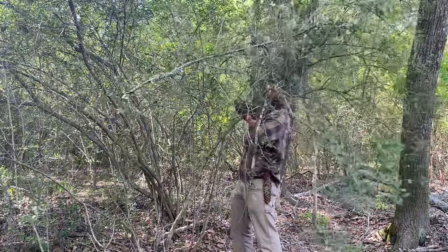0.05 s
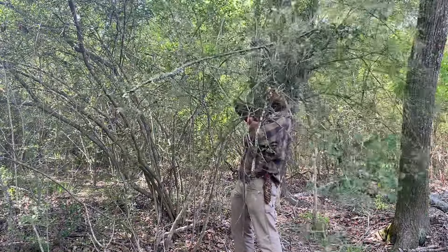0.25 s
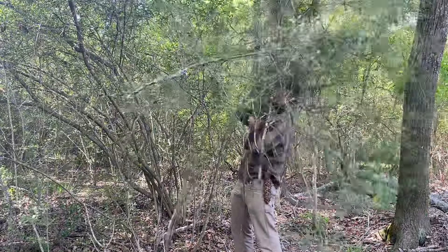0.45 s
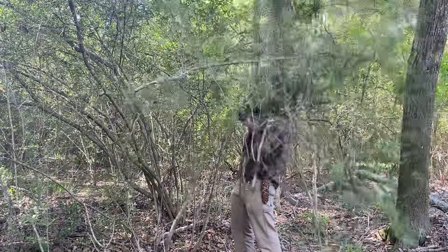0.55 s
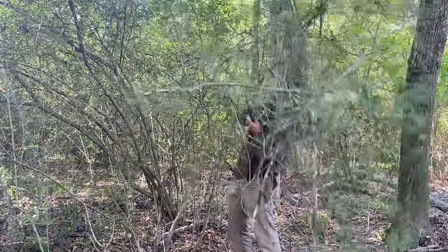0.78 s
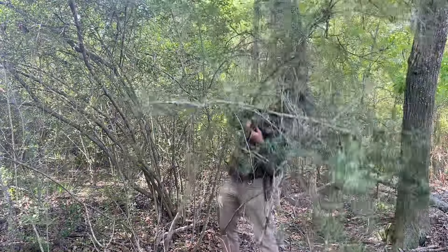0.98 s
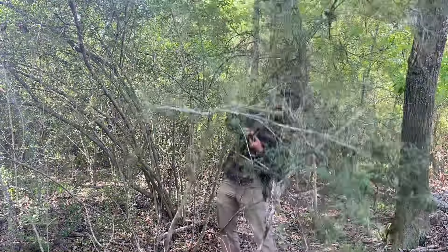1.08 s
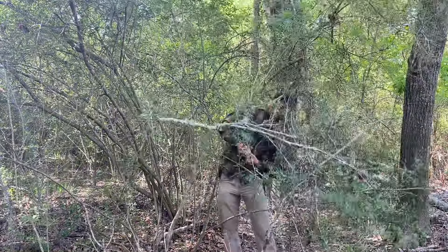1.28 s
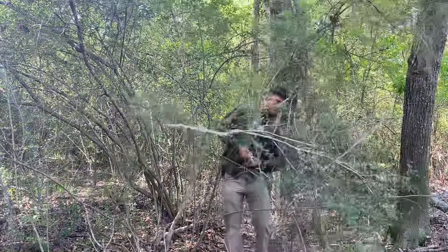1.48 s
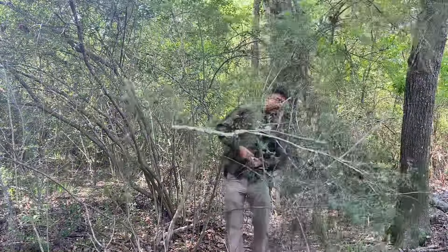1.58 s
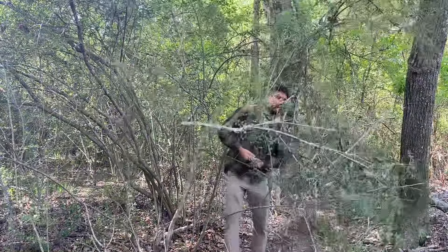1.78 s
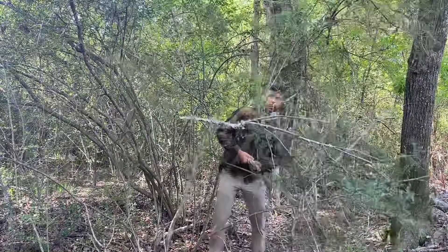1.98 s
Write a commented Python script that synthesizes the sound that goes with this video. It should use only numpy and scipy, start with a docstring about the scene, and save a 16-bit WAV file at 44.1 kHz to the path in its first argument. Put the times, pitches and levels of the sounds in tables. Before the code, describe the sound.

A branch cracks off a tree, then leaves rustle and small twigs snap.

```python
"""A branch is pulled off a tree in a wood. The bough swishes over a low rumble and jolts softly.
Two sharp cracks ring the modes of the wood, a run of fibres tears, and a dull knock sounds as the
branch comes free. Its leaves swish down and rustle, small twigs snap, and feet shuffle on the litter.
Ground and trunks reflect each crack, snap and knock to a closely spaced pair of microphones."""
import sys
import numpy as np
from scipy import signal
from scipy.fft import rfft, irfft
from scipy.io import wavfile
from scipy.ndimage import uniform_filter1d

SR = 44100
rng = np.random.default_rng(int(sys.argv[2]) if len(sys.argv) > 2 else 0)


def wav_record(signal):
    """Record a signal, one row per channel, as 16-bit PCM in the file named by sys.argv[1]."""
    frames = np.transpose(np.atleast_2d(signal))
    bounded = np.clip(frames, -1, 1)
    # unit amplitude maps onto the largest positive 16-bit level
    quanta = np.round(bounded * 32767).astype(np.int16)
    wavfile.write(sys.argv[1], SR, quanta)


N = 90404


def amp(db):
    """Amplitude ratio: tenfold for every 20 dB."""
    return 10 ** (np.asarray(db) / 20)


def unit(x):
    """Normalisation to rms 1."""
    return x / np.sqrt(np.mean(x ** 2) + 1e-20)


def spectrum(points, hz):
    """Interpolation on a log-frequency axis."""
    f, value = np.transpose(points)
    return np.interp(np.log(hz + 1), np.log(f + 1), value)


def envelope(points):
    """Amplitude envelope: gain over time from a dB curve."""
    return amp(np.interp(np.arange(N) / SR, *np.transpose(points)))


def add(mix, start_s, sound):
    """Superposition: a sound sums into the mix from its start time."""
    part = mix[max(round(start_s * SR), 0):][:len(sound)]
    part += sound[:len(part)]


# Likeness of diffuse sound in the two channels. Each row: frequency in Hz, correlation from -1 to 1.
COHERENCE = [(30, 0), (70, 0.7), (160, 0.88), (300, 0.68), (550, 0.06), (900, -.15), (1400, 0.35),
             (2100, 0.73), (3200, 0.56), (4200, 0.65), (5700, 0.04), (7000, 0.96), (8100, 1), (8700, 1),
             (9400, 1), (9900, 0), (10700, .98), (11700, .98), (12300, .6), (12700, 0.75), (13600, 0.95),
             (14100, .5), (14900, .99)]

def diffuse(pair, colour):
    """Partial coherence: two independent signals are coloured and mixed to be partly alike."""
    hz = np.fft.rfftfreq(pair.shape[1], 1 / SR)
    a, b = rfft(pair) * amp(spectrum(colour, hz))
    coherence = np.clip(spectrum(COHERENCE, hz), -1, 1)
    mid, side = a * np.sqrt(1 + coherence), b * np.sqrt(1 - coherence)
    return unit(irfft(np.array([mid + side, mid - side]), pair.shape[1]))


def patchy_noise(colour, flicker_db, size=256):
    """Random modulation: noise flickers in small patches of time and frequency."""
    cells = signal.stft(rng.standard_normal((2, N)), nperseg=size)[2]
    across_bands = uniform_filter1d(rng.standard_normal(cells.shape[1:]), size=14, axis=0)
    patches = unit(uniform_filter1d(across_bands, size=5, axis=1))
    noise = signal.istft(cells * amp(flicker_db * patches), nperseg=size)[1]
    return diffuse(noise[:, :N], colour)


def grains(per_s, spread_db, colour, bands=16):
    """Shot noise: tiny clicks of random time and size each excite a short ring."""
    t, out = np.arange(128) / SR, np.zeros((2, N))
    for hz in np.geomspace(1500, 15000, bands):
        sizes = amp(spread_db * np.minimum(rng.exponential(1, (2, N)), 4))
        occurs = rng.random((2, N)) < per_s / bands / SR / 2
        clicks = sizes * occurs * rng.choice([-1, 1], (2, N))
        ring = np.exp(-t * hz / 3.1) * np.cos(2 * np.pi * hz * t) * hz
        out += signal.oaconvolve(clicks, ring[None], axes=1)[:, :N]
    return diffuse(out, colour)


# Course of the swish. Each row: time in seconds, level in dB.
SWISH_LEVEL = [(0, -60), (.17, -57.5), (.3, -57), (.39, -56), (.44, -59), (.5, -56.5), (.6, -55),
               (.68, -55.5), (.8, -54), (1, -55), (1.13, -60.5), (1.26, -61), (1.35, -60), (1.47, -60.5),
               (1.53, -55), (1.6, -59.5), (1.72, -64), (1.9, -63), (2.05, -62.5)]
# Its spectrum. Each row: frequency in Hz, gain in dB.
SWISH_COLOUR = [(30, -62), (70, -23), (120, -6.5), (200, -3.5), (330, -4.5), (480, -5), (800, -5.5),
                (1300, -10), (2200, -16.5), (5000, -60), (16000, -30)]

def bough_swish():
    """Flow and friction noise: the bough sweeps through air and brush."""
    return envelope(SWISH_LEVEL) * patchy_noise(SWISH_COLOUR, flicker_db=1)


# Course of the rumble. Each row: time in seconds, level in dB.
RUMBLE_LEVEL = [(0, -73), (.06, -66), (.15, -96), (.33, -79), (.39, -67), (.46, -78), (.55, -78.5),
                (.68, -70.5), (.78, -56), (.85, -65), (.98, -54), (1.12, -64.5), (1.4, -78), (1.52, -64),
                (1.6, -83), (1.7, -83), (1.88, -74.5), (1.98, -70), (2.05, -67)]
# Its spectrum. Each row: frequency in Hz, gain in dB.
RUMBLE_COLOUR = [(20, -30), (40, -23), (70, -1), (110, -4.5), (170, -3.5), (300, -47.5), (1000, -64)]

def rumble():
    """Low-frequency noise: steps and moving air make slow pressure fluctuations."""
    return envelope(RUMBLE_LEVEL) * diffuse(rng.standard_normal((2, N)), RUMBLE_COLOUR)


# Courses of the bright and the lower, papery rustle. Each row: time in seconds, level in dB.
BRIGHT_LEVEL = [(0, -74), (.17, -72), (.3, -75), (.37, -47.5), (.43, -52.5), (.5, -55.5), (.57, -47.5),
                (.68, -52), (.85, -56), (1.1, -58.5), (1.3, -54.5), (1.38, -48.5), (1.47, -57),
                (1.51, -49.5), (1.545, -52.5), (1.6, -55.5), (1.68, -60.5), (1.78, -60), (1.83, -55),
                (1.92, -58), (1.98, -51), (2.05, -52.5)]
PAPERY_LEVEL = [(0, -67), (.3, -67), (.4, -58.5), (.5, -60.5), (.6, -54.5), (.8, -61), (1.05, -61),
                (1.2, -56.5), (1.35, -62.5), (1.46, -61.5), (1.54, -61), (1.65, -75), (1.92, -72.5),
                (1.97, -63.5), (2.05, -55)]
# Their spectra. Each row: frequency in Hz, gain in dB.
BRIGHT_COLOUR = [(300, -11), (1200, -8.5), (2800, -6), (4200, -0.5), (6000, -1.5), (8500, 0), (10500, 2.5),
                 (12500, -3.5), (15500, -2.5), (16200, -44)]
PAPERY_COLOUR = [(300, -30), (1000, 0), (2000, -1), (3200, 0.5), (5000, -4.5), (9000, -8), (16000, -61)]

def leaf_rustle():
    """Friction noise: leaves hiss as they brush each other and click as they crinkle."""
    bright = patchy_noise(BRIGHT_COLOUR, flicker_db=2)
    bright += amp(-6.5) * grains(per_s=1700, spread_db=1.5, colour=BRIGHT_COLOUR)
    papery = patchy_noise(PAPERY_COLOUR, flicker_db=2)
    papery += amp(-8.5) * grains(per_s=500, spread_db=6, colour=PAPERY_COLOUR)
    return envelope(BRIGHT_LEVEL) * bright + envelope(PAPERY_LEVEL) * papery


# Jolts of the limb and footfalls.
# Each row: start in seconds, peak level in dB, pitch in Hz, 60 dB decay time in seconds.
KNOCK_EVENTS = [(.106, -48.5, 166, 0.026), (.212, -48, 238.6, 0.082), (.319, -43, 271, 0.059),
                (0.3608, -34, 233, 0.028), (0.5311, -35.5, 334, 0.038), (0.5383, -31.5, 209, 0.069),
                (0.557, -45.5, 245, 0.038), (1.517, -58.5, 271, 0.07), (1.628, -51, 204, 0.029),
                (1.683, -55.5, 147, 0.055), (1.80, -57, 128.6, 0.054), (1.939, -57, 105, 0.059),
                (1.975, -54, 91.5, .06)]

def knocks(rise_s=0.0022, grit_gain=0.31, size=8192):
    """Damped oscillation: each impact gives a few soft, uneven cycles with little deep bass."""
    out, t = np.zeros(N), np.arange(size) / SR
    for start_s, db, hz, t60 in KNOCK_EVENTS:
        band = signal.butter(2, [hz / 1.95, hz * 1.93], "band", fs=SR, output="sos")
        grit = unit(signal.sosfilt(band, rng.standard_normal(size)))
        shape = (1 - np.exp(-(t / rise_s) ** 2)) * amp(-60 * t / t60)
        knock = signal.sosfilt(band, shape * (grit_gain * grit - np.sin(2 * np.pi * hz * t)))
        add(out, start_s, amp(db) * knock / abs(knock).max())
    return out


def minimum_phase(db, size=4096):
    """Minimum phase: the Hilbert transform of the log gain yields a causal click's spectrum."""
    log_gain = np.log(amp(db))
    mirrored = np.r_[log_gain, log_gain[-2:0:-1]]
    return np.exp(np.conj(signal.hilbert(mirrored)))[:size // 2 + 1]


def fracture(colour_db, spread_s=0.00058, splinter_s=0.0012, splinter_hz=3500, size=4096):
    """Dispersion: bending waves bring a break's treble first; small splinters add a bright spray."""
    hz, t = np.fft.rfftfreq(size, 1 / SR), np.arange(size) / SR
    delay_s = spread_s * (np.sqrt(8000 / (hz + 500)) - 1) + .001
    click = minimum_phase(colour_db) * np.exp(-2j * np.pi * np.cumsum(delay_s) * SR / size)
    spray = unit(rng.standard_normal(size) * np.exp(-t / splinter_s)) / np.sqrt(size)
    splinters = amp(-3) * rfft(spray) * hz ** 4 / (hz ** 4 + splinter_hz ** 4)
    sound = irfft(click * (1 + splinters))
    return unit(sound) * np.sqrt(.001 * SR / size)  # the energy of 1 ms at rms 1


# Spectrum of breaking fibres. Each row: frequency in Hz, gain in dB.
FIBRE_COLOUR = [(50, -37), (130, -46), (230, -18), (600, -4), (1000, -11.5), (2000, -18.5), (2500, -8),
                (3200, -10), (4000, 2), (5200, 1), (7000, -5.5), (8300, 5), (9400, -2), (11000, -5.5),
                (13000, -14), (16000, -15.5)]
# Modes of the branch. Each row: frequency in Hz, level in dB, nominal 60 dB decay time in seconds.
WOOD_MODES = [(1430, -12.5, .015), (1835, -8, 0.0078), (2116, -10.5, 0.0098), (3674, -9, 0.0085),
              (4230, -12, 0.0057), (4755, -11, .009)]
# Cracks of the branch. Each row: start in seconds, level in dB, wood ring in dB, bass gain in dB,
# treble tilt in dB per octave.
CRACK_EVENTS = [(.1857, -35, -10, 3.5, -0.5), (.2121, -16.5, -3, -3.5, 2.2), (.2159, -30, 3, 10, -11),
                (.2755, -61, -2, 8, -3), (.3175, -15.5, -1.5, 0, -1.5), (.3210, -22, -13, -3.5, -3),
                (.3227, -35, -6.5, 15, 3.5), (.3359, -37, -10, -8, -9), (.3450, -35, -30.5, -13, 5),
                (.3525, -34, -4, 14, 3), (.3560, -23, -17, 5, 3), (.3615, -24, -16, 12, 4.5),
                (.3638, -31.5, -3, 10, -22), (.3670, -42, -8, 27, -18), (.5241, -38, -18, -8, 10),
                (.5305, -33.5, -18, -3, -11)]

def branch_cracks(size=4096):
    """Modal resonance: each crack has the colour of the fibres and rings the modes of the wood."""
    out, hz = np.zeros(N), np.fft.rfftfreq(size, 1 / SR)
    mode_power = sum((amp(db) * t60 * 900) ** 2 / (1 + ((hz - f) * t60 / 0.88) ** 2) ** 2
                     for f, db, t60 in WOOD_MODES)
    mode_power /= 1 + (1100 / (hz + 1)) ** 6  # high-pass at 1100 Hz
    treble_octaves = np.log2(np.maximum(hz / 4000, 1))
    for start_s, db, ring_db, bass_db, tilt_db in CRACK_EVENTS:
        shelf_db = bass_db / (1 + (hz / 1200) ** 4)
        fibre_db = spectrum(FIBRE_COLOUR, hz) + shelf_db + tilt_db * treble_octaves
        colour_db = 10 * np.log10(amp(fibre_db) ** 2 + amp(ring_db) ** 2 * mode_power)
        add(out, start_s - .001, amp(db) * fracture(colour_db))
    return out


# Courses of the tear and of the splitting wood's low crunch. Each row: time in seconds, level in dB.
TEAR_LEVEL = [(.318, -76), (.325, -35), (.342, -40.5), (.364, -36), (.373, -76), (.42, -52), (.5, -67.5)]
CRUNCH_LEVEL = [(.314, -73), (.323, -34.5), (.338, -57), (.35, -49), (.364, -31), (.375, -72), (.42, -50),
                (.47, -88)]
# Spectrum of the crunch. Each row: frequency in Hz, gain in dB.
CRUNCH_COLOUR = [(100, -51), (280, -23), (420, 5), (560, 15.5), (740, -18), (950, 6), (1150, 3),
                 (1420, -11.5), (1800, -17.5), (3000, -1), (16000, -60)]

def tearing():
    """Acoustic emission: dense small fractures and a low crunch as the last fibres let go."""
    fibres = grains(per_s=4500, spread_db=-1.5, colour=FIBRE_COLOUR)
    crunch = grains(per_s=2200, spread_db=5, colour=CRUNCH_COLOUR)
    return envelope(TEAR_LEVEL) * fibres + envelope(CRUNCH_LEVEL) * crunch


# Breaking twigs. Each row: start in seconds, level in dB, centre frequency in Hz, width in octaves.
SNAP_EVENTS = [(.6544, -54, 6000, 1.4), (.8902, -37.5, 10500, 0.5), (.9665, -46, 1960, 1.3),
               (1.0919, -46.5, 4900, 0.36), (1.166, -54, 3500, 0.99), (1.3571, -39, 9500, 1.3),
               (1.3812, -48, 8000, .9), (1.403, -44.5, 3000, 1.5), (1.506, -42.5, 5400, 0.45),
               (1.5253, -32, 6400, 0.61), (1.5273, -28, 6500, 0.46), (1.5465, -40.5, 4900, 0.51),
               (1.5570, -43.5, 4730, 0.5), (1.6272, -38, 10000, 1.75), (1.6381, -48, 9000, 1.3),
               (1.6924, -45, 8000, 0.67), (1.6961, -33, 8150, 0.2), (1.7001, -44, 7900, 0.47),
               (1.7412, -49.5, 4230, 0.62), (1.7962, -29, 7280, 0.22), (1.7964, -33, 11800, 0.24),
               (1.7979, -50, 7500, 0.72), (1.7978, -45, 3900, 0.11), (1.9447, -34.5, 9100, 0.51),
               (1.9464, -35, 6000, 1.2), (1.9482, -46, 6050, 2.2), (2.0014, -41, 9050, 0.35)]

def twig_snaps(skirt_db=-24, size=4096):
    """Damped resonance: a thin twig snaps with one broad, high peak over a weak broadband click."""
    out, hz = np.zeros(N), np.fft.rfftfreq(size, 1 / SR)
    for start_s, db, centre_hz, octaves in SNAP_EVENTS:
        resonance = np.exp(-.5 * (np.log2((hz + 1) / centre_hz) / octaves) ** 2)
        skirt = amp(skirt_db) * (hz + 1) / (hz + 200)
        add(out, start_s - .001, amp(db) * fracture(20 * np.log10(resonance + skirt)))
    return out


# Spectrum of the scattered sound. Each row: frequency in Hz, gain in dB.
SCATTER_COLOUR = [(100, -3), (700, -0.5), (1400, 4), (2000, -5.5), (3000, 0.5), (4500, -1.5), (8000, -2),
                  (15000, -0.5)]

def forest_echoes(x, ground_s=0.0045, trunk_s=0.0032, size=32768):
    """Reflection and scattering: direct sound, echoes off the ground and a trunk, two diffuse tails."""
    t, out = np.arange(size) / SR, np.array([x, x])
    for channel in out:
        add(channel, ground_s, amp(-25) * x)
    add(out[1], trunk_s, amp(-6.5) * x)  # the trunk stands to the right
    onset = 1 - np.exp(-(t / 0.0025) ** 2)
    for db, t60 in (-7.5, 0.12), (-19, 0.78):  # near brush, far trunks
        tail = diffuse(rng.standard_normal((2, size)), SCATTER_COLOUR) * amp(-60 * t / t60) * onset
        out += amp(db) * signal.fftconvolve(x[None], unit(tail) / np.sqrt(size), axes=1)[:, :N]
    return out


def scene():
    """Superposition: the echoing transients sum with the diffuse noises."""
    transients = branch_cracks() + twig_snaps() + knocks()
    return forest_echoes(transients) + tearing() + leaf_rustle() + bough_swish() + rumble()


# Phase shift from stereo processing. Each row: frequency in Hz, lead of the left channel in radians.
LEFT_LEAD = [(0, 0), (600, .1), (1200, -.4), (2300, 0), (3000, .5), (4000, 0), (5600, -.5), (6200, .1),
             (7400, -.1), (8700, -3.1), (9400, -3.2), (10600, -6.2), (11800, -6.4), (12700, -9.4),
             (13650, -9.45), (14800, -12.5), (17000, -12.6)]

def record(dry, cutoff_hz=16500):
    """Phase shift: stereo processing turns treble bands out of phase between left and right."""
    hz = np.fft.rfftfreq(N, 1 / SR)
    phase = np.interp(hz, *np.transpose(LEFT_LEAD))
    shifted = irfft(rfft(dry) * np.exp(.5j * np.array([phase, -phase])), N)
    low_pass = signal.firwin(255, cutoff_hz, window=("kaiser", 9), fs=SR)
    return signal.oaconvolve(shifted, low_pass[None], "same")


dry = scene()
out = record(dry)
wav_record(out)
```